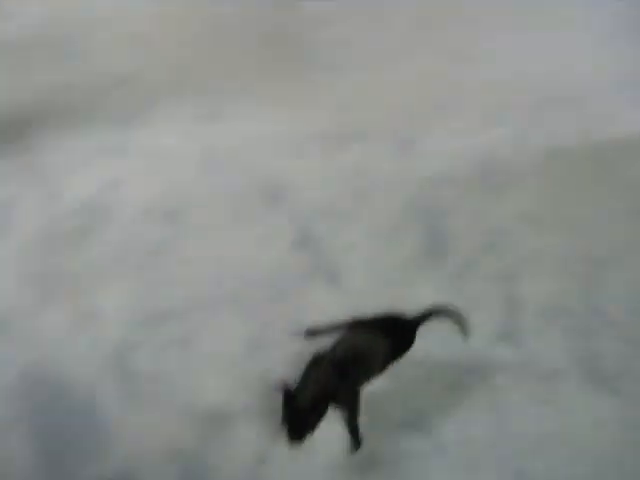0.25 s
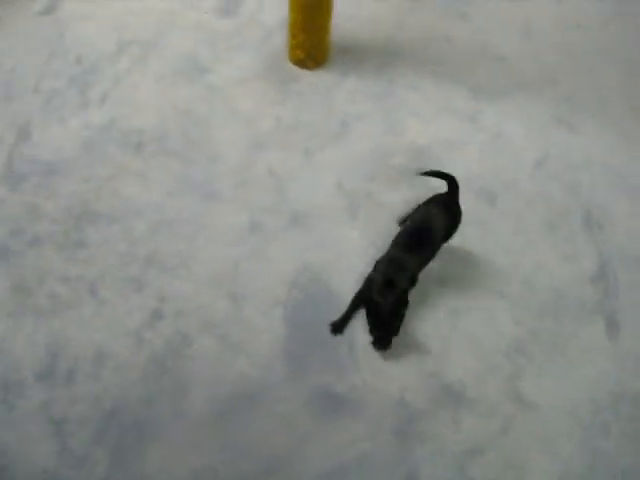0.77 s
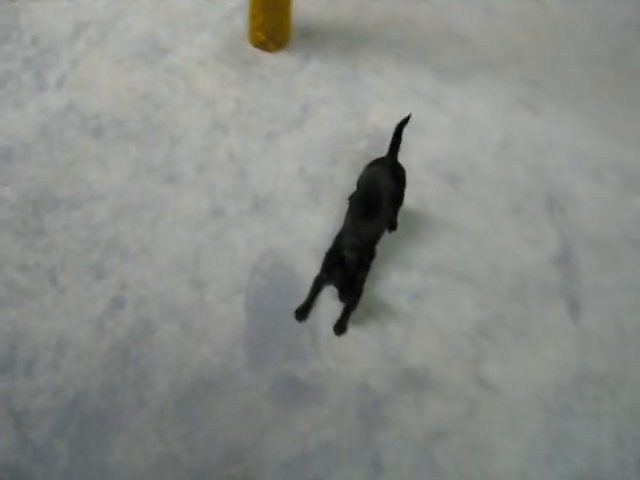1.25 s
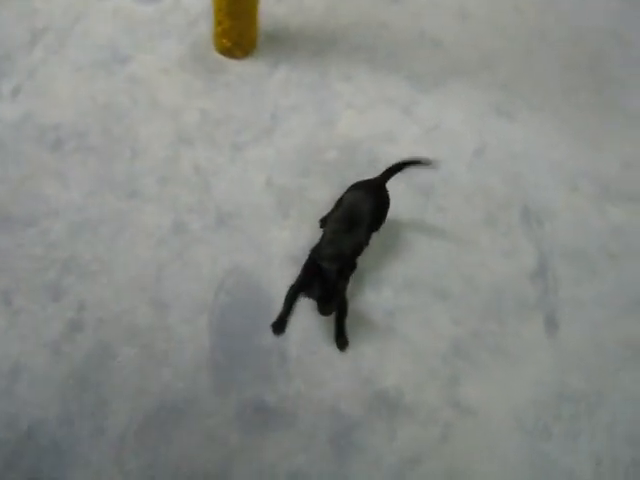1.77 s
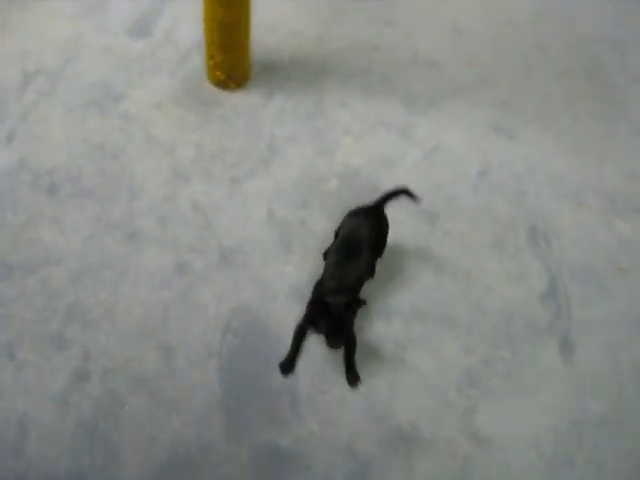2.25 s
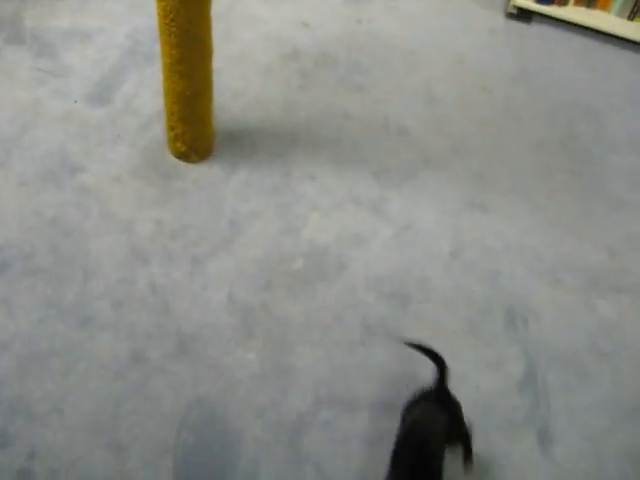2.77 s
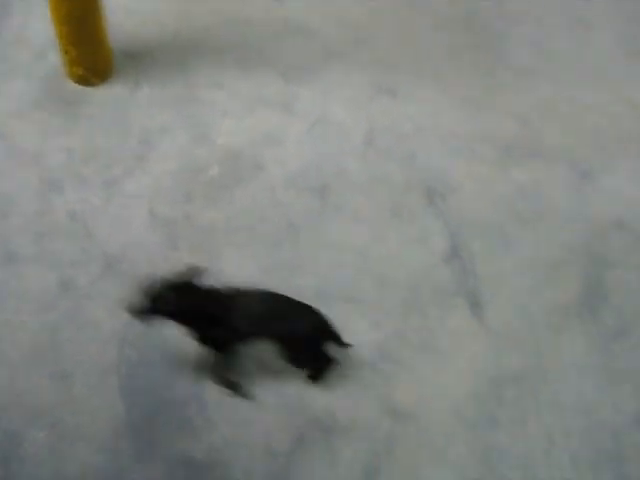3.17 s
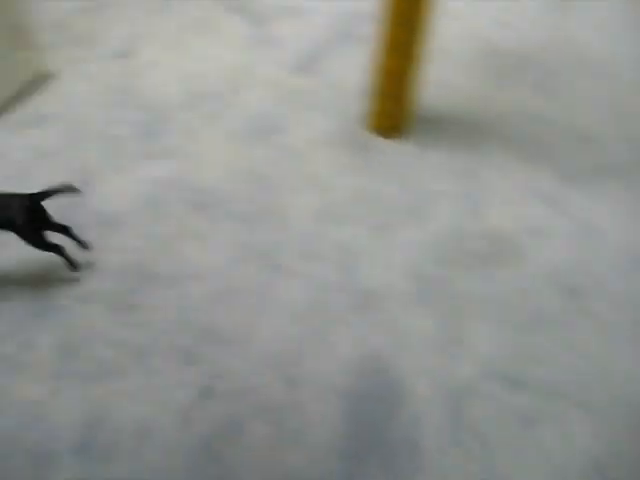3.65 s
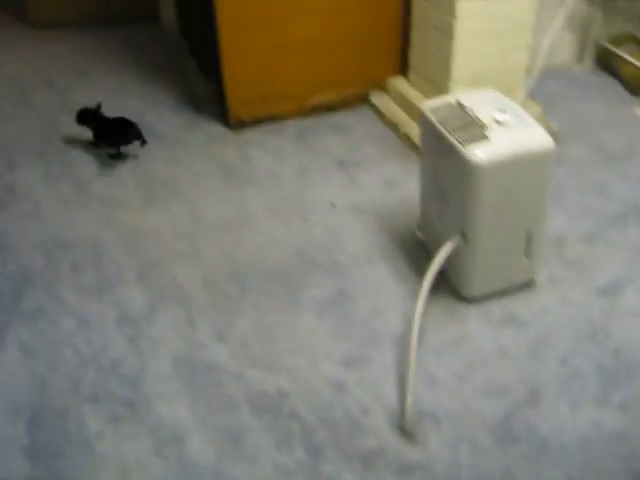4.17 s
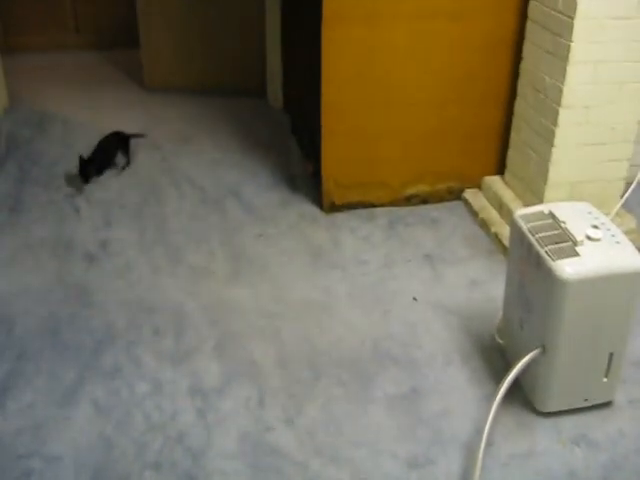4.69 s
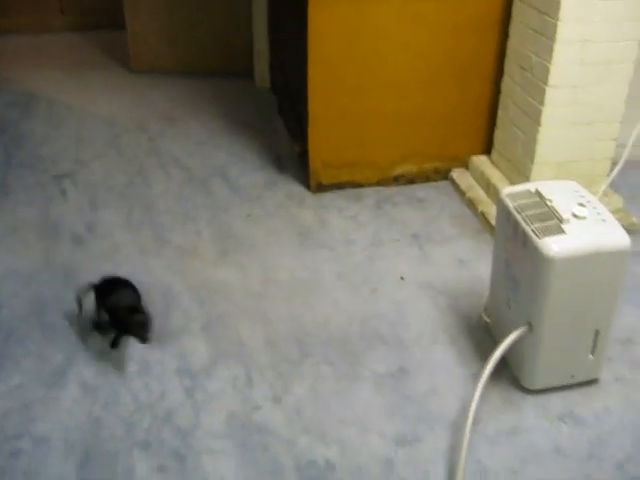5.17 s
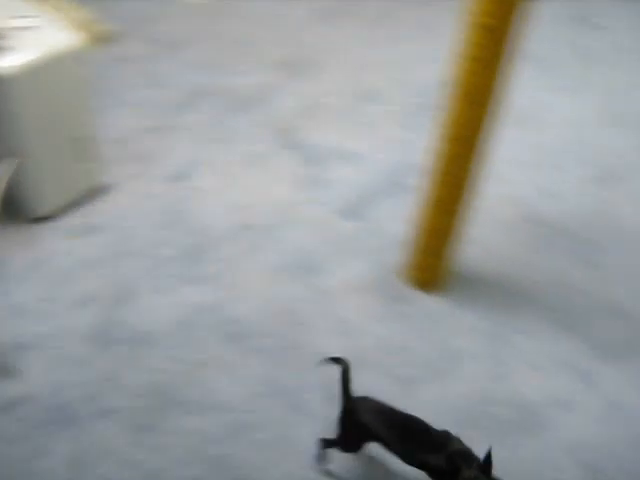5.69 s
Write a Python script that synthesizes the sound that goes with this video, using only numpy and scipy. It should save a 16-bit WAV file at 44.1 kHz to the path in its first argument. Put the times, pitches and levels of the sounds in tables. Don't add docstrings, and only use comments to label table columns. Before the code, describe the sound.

Faint fan wash and light claw and paw noise on carpet open the scene, with near-still gaps. A rough little growl rises to a bark and cracking yip around three seconds, with clacks. Quick footfalls follow, then a gape and closed grumble. From five seconds come snappy yaps, a double chewing call and loud short knocks; a last bark drops away. Small microphone, slight room echo.

```python
import sys
import numpy as np
from scipy import signal
from scipy.fft import irfft
from scipy.io import wavfile
from scipy.ndimage import uniform_filter1d

SR = 44100
rng = np.random.default_rng(int(sys.argv[2]) if len(sys.argv) > 2 else 0)


def voltage_ratio(level):
    return 10 ** (np.asarray(level, float) / 20)


def dump(signal):
    limited = np.clip(np.atleast_2d(signal).T, -1, 1)
    pcm = np.round(limited * 32767).astype(np.int16)
    wavfile.write(sys.argv[1], SR, pcm)


N = 261556


def evened(x):
    return x / np.sqrt(np.mean(x ** 2) + 1e-20)


def steady(x):
    return x / np.sqrt(abs(uniform_filter1d(x ** 2, 1500)) + 1e-12)


def wander(n, span):
    return evened(uniform_filter1d(uniform_filter1d(rng.standard_normal(n), span), span))


def band(x, lo_hz, hi_hz):
    return evened(signal.sosfilt(signal.butter(2, [lo_hz, hi_hz], "band", fs=SR, output="sos"), x))


def highpass(x, order, hz):
    return signal.sosfilt(signal.butter(order, hz, "high", fs=SR, output="sos"), x)


def resonate(x, hz, width):
    turn = np.exp(2j * np.pi * np.cumsum(hz * np.ones(len(x))) / SR)
    r = np.exp(-np.pi * width / SR)
    return 2 * (turn * signal.lfilter([1 - r], [1, -r], x / turn + 1e-18)).real


def read(points, hz):
    f, value = np.transpose(points)
    return np.interp(np.log(hz + 1), np.log(f + 1), value)


def columns(rows):
    s, *rest = np.transpose(rows)
    t = np.arange(s[0], s[-1] + 0.005, 1 / SR)
    edge = np.sqrt(np.clip(np.minimum(t - s[0], t[-1] - t) / 0.005, 0, 1))
    step = np.interp(t, s, np.arange(len(s)))
    step -= 0.6 * np.sin(2 * np.pi * step) / (2 * np.pi)
    return s[0], edge, [np.interp(step, np.arange(len(s)), c) for c in rest]


def add(mix, s, sound):
    part = mix[round(s * SR):][:len(sound)]
    part += sound[:len(part)]


def tract(rows, throat_hz, mouth_from_hz, mouth_to_hz, teeth_from_hz, teeth_to_hz, throat_db, shift):
    s, chest_db, hz, jaw, lips = np.transpose(rows)
    glide = (s - s[0]) / (s[-1] - s[0])
    throat = throat_hz * (1 + shift * (glide - 0.5))
    mouth = mouth_from_hz + (mouth_to_hz - mouth_from_hz) * glide
    teeth = teeth_from_hz + (teeth_to_hz - teeth_from_hz) * glide
    throat_level, mouth_level, teeth_level = throat_db - 4.5 + 7 * jaw, -10.5 + 25 * jaw, -25 + 29.5 * lips
    return np.transpose([s, chest_db, hz, throat, throat_level, mouth, mouth_level, teeth, teeth_level])


def growl(rows, rough, group, pace, throat_width, back, cheek, beat_db, throb_db):
    s, edge, (chest_db, hz, throat_hz, throat_db, mouth_hz, mouth_db, teeth_hz, teeth_db) = columns(rows)
    n, rough = len(hz), np.clip(rough, 0, 1)
    turns = np.cumsum(pace * hz * (1 + 0.13 * rough * wander(n, 90))) / SR
    pulses = evened(np.diff(np.floor(turns), prepend=0))
    puffs = evened((0.42 + np.exp(-(turns % 1) / 0.5)) * rng.standard_normal(n))
    flutter = turns / group + 0.25 * rough * wander(n, 400)
    beat = voltage_ratio(beat_db * np.cos(2 * np.pi * flutter) + 2.6 * rough * wander(n, 350))

    def ring(f, width, air):
        x = beat * ((1 - air * rough) * pulses + air * rough * puffs)
        for share in (1, 5.2, 4.86):
            x = resonate(x, f, share * width)
        return steady(x)

    chest = ring(hz, 255, 0.99) + 0.19 * ring(2 * hz, 134, 0.13)
    throat = ring(throat_hz, throat_width, 1.0)
    mouth = steady(ring(mouth_hz, 210, 0.9) + back * ring(1.27 * mouth_hz, 140, 0.9))
    teeth = ring(teeth_hz, 280, 0.89) + 0.18 * ring(1.078 * teeth_hz, 200, 1.0)
    teeth = steady(teeth + cheek * ring(0.72 * teeth_hz, 330, 0.6))
    throb_turns = np.cumsum(33.2 * (1 + 0.028 * wander(n, 2000))) / SR
    throb = voltage_ratio(throb_db * np.cos(2 * np.pi * (throb_turns - 0.4)))
    voice = throb * chest - np.sqrt(throb) * voltage_ratio(throat_db) * throat
    voice += voltage_ratio(mouth_db) * mouth - throb * voltage_ratio(teeth_db) * teeth
    return s, voltage_ratio(chest_db) * edge * highpass(voice, 3, 200)


def calls():
    # (time [s], chest level [dB], fold rate [Hz], jaw [0 shut - 1 wide],
    # lips [0 closed - 1 drawn off the teeth])
    growls = [
        [(2.828, -39.5, 314.4, 0.52, 0.9), (2.87, -38.5, 330.3, 0.42, 0.85), (2.888, -39.5, 339.8, 0.58, 0.3),
         (2.905, -39.5, 332.5, 0.65, 0.61), (2.93, -40, 325, 0.39, .05), (2.995, -39, 307, 0.14, .01)],
        [(4.2, -52, 358.4, 0.89, 0.96), (4.226, -35, 409.8, 0.74, 0.61), (4.265, -36, 318.8, 0.24, 0.12),
         (4.315, -43.5, 312.5, 0.36, 0.13), (4.365, -44, 289, 0.13, .05)],
        [(4.37, -44, 308, 0.35, 0.12), (4.43, -35, 308, .2, 0.055), (4.49, -46, 305, 0.49, 0.13),
         (4.56, -43.5, 304.3, 0.41, 0.18), (4.624, -44, 302, 0.15, 0.43), (4.645, -56, 304, .15, 0.78),
         (4.68, -72, 305, .05, 1.48)],
    ]
    yaps = [
        [(4.938, -40, 306, 0.087, 0.72), (4.976, -46, 333.3, 0.68, 0.87), (5.02, -52.5, 375, 0.083, 0.94)],
        [(5.148, -46.5, 268.7, .05, 0.99), (5.175, -45.5, 286.1, 0.54, 0.89), (5.2, -41.5, 298.9, 1.05, 1.09),
         (5.245, -42.5, 396, 0.41, 0.42)],
        [(5.245, -48, 355.5, .1, 1), (5.263, -36, 335, 0.87, 0.88), (5.3, -40, 344.6, 0.54, 0.81),
         (5.33, -47, 352, .3, 0.58)],
        [(5.33, -46, 316.6, 0.38, 0.23), (5.344, -48, 321.2, 0.83, 0.99), (5.372, -37, 336, 0.42, 0.26),
         (5.396, -35, 366, 0.88, 0.7), (5.425, -39, 356.4, 0.7, 0.63), (5.453, -39.5, 330.3, 0.38, 0.36),
         (5.49, -54, 326, .2, 0.74)],
        [(5.62, -43, 319, .05, .5), (5.636, -36.5, 320.3, 0.58, 0.83), (5.71, -58, 347, .05, 0.63)],
    ]
    barks = [
        [(2.995, -42, 364.2, 0.58, .1), (3.029, -35, 396.6, 0.69, 0.33), (3.06, -33.5, 400.8, 0.73, 0.5),
         (3.085, -37, 425.6, 0.76, 0.52), (3.123, -32, 528.7, 1.25, 0.84), (3.138, -63, 544, 1.2, 0.55)],
        [(5.778, -41, 405, 0.44, 0.81), (5.795, -30.5, 421, 0.44, 0.61), (5.82, -33, 415.2, .6, 0.71),
         (5.845, -38, 381.4, 0.6, 0.6), (5.855, -33.5, 371, 0.18, 0.14), (5.896, -38.5, 314, 0.078, 0.046),
         (5.93, -56, 303, 0.013, 0.85)],
    ]
    # (throat [Hz], mouth from [Hz], mouth to [Hz], teeth from [Hz], teeth to [Hz])
    cavities = [(837, 1660, 1550, 3850, 4000), (827, 1450, 1400, 3610, 4300), (799, 1394, 1330, 3300, 2740),
                (1500, 2420, 2480, 3350, 4600), (880, 1520, 1676, 3050, 4800),
                (910, 1400, 1280, 3100, 2900), (880, 1270, 1360, 3490, 3450), (950, 1510, 1380, 3900, 2900),
                (770, 1390, 1290, 3600, 3970), (770, 1570, 1340, 3890, 2940)]
    shifts = [-.03, -0.044, .01, .01, .01, .01, -0.15, .01, -0.016, -.11]
    folds = [(.6, 3, 1), (.55, 3, 1), (.5, 2, 2 / 3), (.95, 2, 1), (.6, 2, 1), (.3, 2, 1), (.45, 2, 1),
             (.62, 2, 1), (.45, 2, 1), (.38, 3, 1)]
    # (throat level [dB], throat width [Hz], back of the mouth [share],
    # cheek [share], group beat [dB])
    colours = [(0.6, 410, 0.45, 0.76, 3), (3.5, 205, 0.99, .35, 2), (6.5, 105, 0.84, .35, 3.5),
               (3.5, 520, 0.27, .35, 2.1), (2, 380, 1, 0.37, 0.5), (-10, 100, .9, .3, 2.5),
               (2.5, 97, 0.34, 0.53, 2.5), (0.5, 115, 0.69, .35, 4.5), (0.5, 120, 0.73, 0.16, 1.5),
               (4.5, 195, 0.67, 0.38, 3)]
    mix = np.zeros(N)
    for i, rows in enumerate(growls + yaps + barks):
        throat_db, *colour = colours[i]
        throb_db = 2.5 if i < len(growls) else 0
        add(mix, *growl(tract(rows, *cavities[i], throat_db, shifts[i]), *folds[i], *colour, throb_db))
    return mix


def yip_note(rows, tones, fray):
    s, edge, (hz, level_db) = columns(rows)
    n = len(hz)
    turns = np.cumsum(hz * (1 + np.linspace(0.004, fray, n) * wander(n, 45))) / SR
    opening = np.minimum(np.linspace(0, 2.2, n), 1)
    flicker_db = np.linspace(1.6, 3.0 + 70 * fray, n)
    stack = np.zeros(n)
    for k, (start_db, end_db) in enumerate(tones):
        tone_db = start_db + (end_db - start_db) * opening + flicker_db * wander(n, 110)
        stack += voltage_ratio(tone_db) * np.cos(2 * np.pi * ((k + 1) * turns + rng.random()))
    breath = band(band(rng.standard_normal(n), 1200, 4800), 1000, 4800)
    return s, voltage_ratio(level_db) * edge * (steady(stack) + voltage_ratio(-15) * breath)


def yip():
    # (time [s], pitch [Hz], level [dB])
    low = [(3.121, 565, -14), (3.13, 578, -26), (3.138, 613, -17.5), (3.15, 634, -15.5),
           (3.162, 653.6, -24), (3.171, 654, -21), (3.185, 581, -28.5)]
    high = [(3.179, 1414, -56), (3.187, 1019, -19.5), (3.2, 1063, -23), (3.21, 1150, -21.5),
            (3.222, 1114, -27), (3.245, 1103, -31), (3.27, 1140, -34), (3.31, 1158, -41),
            (3.355, 1140, -46)]
    # (level at the start [dB], level at the end [dB])
    low_tones = [(-25, -49), (8, -11), (16, 2), (14, 3), (-26, -13), (8.5, 5), (10, 5), (-16, -11),
                 (-10, -12.5), (0, -11.5)]
    high_tones = [(5, 5.5), (-4, 18.5), (-5, 13.5), (10.5, -12), (-5, -43), (-47, -42)]
    mix = np.zeros(N)
    add(mix, *yip_note(low, low_tones, fray=0.012))
    add(mix, *yip_note(high, high_tones, fray=0.04))
    return mix


def fibres(n):
    sizes_db = 1.0 * rng.exponential(1, n) + 2.0 * wander(n, 60) + 1.4 * wander(n, 500)
    return rng.standard_normal(n) * voltage_ratio(sizes_db)


def stroke(s, rise, fall, top, ends):
    low = np.add(top, ends)
    hold = 0.12
    return [(s - abs(rise), *low), (s - hold * abs(rise), *top), (s + hold * abs(fall), *top),
            (s + abs(fall), *low)]


def pant(rows):
    s, edge, (fizz_db, hiss_db) = columns(rows)
    x = fibres(len(edge))
    patch = evened(resonate(x, 12000 + 1500 * wander(len(x), 900), 900))
    whistle = evened(resonate(x, 6450, 350))
    hiss = evened(band(x, 4800, 7000) + 0.8 * whistle)
    fizz = evened(band(x, 4600, 13200) + 0.44 * patch)
    return s, voltage_ratio(fizz_db) * edge * (fizz + voltage_ratio(hiss_db) * hiss)


def pants():
    # (peak time [s], rise [s], fall [s], fizz level [dB], hiss above the fizz [dB])
    breaths = [
        (2.849, 0.032, 0.29, -63, -1),
        (3.159, 0.14, 0.038, -45.5, -21),
        (4.222, 0.025, 0.082, -51.5, -11),
        (4.971, 0.03, 0.043, -44, -1.5),
        (5.186, 0.016, 0.045, -40.5, -5.5),
        (5.269, 0.027, 0.099, -56, -15),
        (5.389, 0.028, 0.077, -53.5, -17),
        (5.63, 0.01, 0.049, -52.5, 1),
        (5.788, 0.029, 0.11, -54.5, 5),
        (5.925, 0.026, .02, -50.5, -3),
    ]
    mix = np.zeros(N)
    for s, rise, fall, *top in breaths:
        add(mix, *pant(stroke(s, rise, fall, top, [-14, 0])))
    return mix


def wheezes():
    # (middle time [s], level [dB], pitch [Hz])
    puffs = [
        (2.9, -58, 14000),
        (2.93, -59, 13300),
        (2.965, -54, 13900),
        (3.0, -54, 13900),
        (3.04, -53, 10700),
        (3.095, -60, 10000),
        (3.135, -50, 12900),
        (3.215, -49.5, 12500),
    ]
    mix = np.zeros(N)
    for s, db, hz in puffs:
        bell = np.hanning(round(0.057 * SR))
        f = hz * np.linspace(1.04, 0.96, len(bell))
        whistle = evened(resonate(resonate(fibres(len(bell)), f, 900), f, 1200))
        add(mix, s - len(bell) / SR / 2, voltage_ratio(db) * bell * whistle)
    return mix


def scuff(rows):
    s, edge, (fizz_db, *above_db) = columns(rows)
    x = fibres(len(edge))
    sound = evened(band(x, 8400, 10900) + 1.2 * band(x, 11300, 15200))
    ranges_hz = [(3900, 6600), (1900, 4100), (400, 2100)]
    for db, hz in zip(above_db, ranges_hz):
        sound = sound + voltage_ratio(db) * band(fibres(len(x)), *hz)
    return s, voltage_ratio(fizz_db) * edge * sound


def scuffs():
    # (peak time [s], rise [s], fall [s], fizz level [dB], coarseness [dB])
    drags_of_paws = [(0.217, 0.15, .085, -46.5, -12), (0.44, 0.014, 0.067, -57.5, 4.5),
                     (0.5, 0.036, 0.12, -63.5, 6.5), (0.674, 0.056, 0.17, -56, 2),
                     (0.821, 0.078, 0.18, -78, 5), (1.474, 0.051, 0.22, -66.5, 8.5),
                     (1.6, 0.078, 0.079, -59.5, 4.5), (2.378, 0.12, 0.15, -53.5, 1.5),
                     (2.568, 0.014, .11, -59.5, 3), (2.69, 0.054, 0.065, -61, -6),
                     (2.811, 0.074, 0.091, -59, 1.5), (3.335, 0.028, 0.07, -49, 7),
                     (3.424, 0.031, 0.21, -60, 6), (3.63, 0.097, 0.2, -61, -1), (3.72, .012, 0.08, -66, 14),
                     (3.772, 0.056, 0.09, -45, -9), (3.89, .05, 0.047, -64, 5),
                     (3.951, 0.022, 0.2, -60, -0.5), (4.006, 0.051, 0.11, -69, 5),
                     (4.409, 0.053, 0.11, -64, -1), (4.599, 0.083, 0.12, -64.5, 7.5),
                     (4.82, 0.064, 0.15, -75, 13.5), (5.04, 0.041, 0.12, -79, 18),
                     (5.585, 0.084, 0.13, -60.5, 7.5), (5.741, 0.038, 0.13, -68.5, 11)]
    mix = np.zeros(N)
    for s, rise, fall, db, coarse in drags_of_paws:
        # fizz, then hiss, scrape and rustle above it [dB]
        top = [db, 3.24 + 0.15 * coarse, 0.13 + coarse, 2.3 + 0.99 * coarse]
        ends = [0.43 * (-87 - db), 0, 0, 4]
        add(mix, *scuff(stroke(s, rise, fall, top, ends)))
    return mix


def claw_drags():
    starts = [3.71, 5.583, .49, .655]
    # (length [s], level [dB], pitch from [Hz], pitch to [Hz])
    rasps = [
        (0.077, -47.5, 1600, 4000),
        (0.027, -44, 4200, 4100),
        (0.057, -50, 4400, 4500),
        (0.079, -47.5, 5000, 5000),
    ]
    mix = np.zeros(N)
    for s, (length, db, from_hz, to_hz) in zip(starts, rasps):
        bell = np.sqrt(np.hanning(round(length * SR)))
        rasp = resonate(fibres(len(bell)), np.linspace(from_hz, to_hz, len(bell)), 1300)
        add(mix, s, voltage_ratio(db) * bell * evened(rasp))
    return mix


def knock(s, db, hz, t60, grit):
    t = np.arange(0, 0.25, 1 / SR)
    noise = band(rng.standard_normal(len(t)), hz / 1.7, min(hz * 1.8, 16000))
    shape = voltage_ratio(db - 3 - 60 * t / t60) * (1 - np.exp(-t * hz * 1.8))
    return s, shape * (np.sin(2 * np.pi * hz * t) + grit * noise)


def paw_falls():
    # (time [s], level [dB], floor pitch [Hz])
    falls = [(0.154, -38, 172), (0.372, -43, 181), (0.426, -37, 160), (0.677, -47, 167),
             (1.545, -42.5, 143), (2.427, -45, 151), (2.782, -42.5, 167), (3.301, -37, 181),
             (3.385, -40, 174), (3.426, -35, 164), (3.499, -39.5, 176), (3.613, -46, 166),
             (3.714, -39.5, 287), (3.796, -35, 195), (3.818, -33, 179), (3.945, -33, 205),
             (3.969, -45, 195), (4.04, -39, 245), (4.186, -33.5, 278), (4.783, -45.5, 287),
             (5.028, -41, 181), (5.13, -34, 210), (5.175, -28, 222), (5.552, -29.5, 208.5),
             (5.599, -39, 220), (5.753, -33, 203)]
    mix = np.zeros(N)
    for row in falls:
        add(mix, *knock(*row, t60=0.079, grit=1.0))
    return mix


def snags():
    # (time [s], level [dB], pitch [Hz])
    hits = [(0.455, -31, 2500), (0.674, -35, 940), (0.689, -27, 880), (1.579, -32, 1610),
            (2.563, -30.5, 1016), (3.031, -10.5, 1610), (3.35, -14.5, 790), (3.48, -30.5, 880),
            (5.205, -7, 1660), (5.38, -4.5, 1280), (5.789, -11.5, 760), (0.428, -43, 1500),
            (3.002, -15.5, 1600), (5.031, -33, 990), (5.132, -32, 910), (5.151, -29, 1120),
            (5.162, -27, 1200)]
    mix = np.zeros(N)
    for row in hits:
        add(mix, *knock(*row, t60=0.014, grit=0.12))
    return mix


def claw_ticks():
    # (time [s], level [dB], pitch [Hz])
    catches = [(0.4278, -33, 5900), (0.454, -38, 6030), (0.614, -38.5, 5560), (0.6374, -48, 11000),
               (0.51, -39, 3960), (2.457, -38, 3600), (2.4667, -33.5, 3370), (2.5613, -37, 4260),
               (2.645, -41, 3440), (2.707, -39.5, 3430), (2.995, -32, 3350), (3.3944, -46, 5160),
               (3.455, -39, 5500), (3.48, -30, 3470), (4.0194, -35, 5400), (5.1532, -39, 3660),
               (5.162, -40, 3300)]
    mix = np.zeros(N)
    for s, db, hz in catches:
        add(mix, *knock(s, db - 1.5, hz, t60=0.014, grit=0.89))
    return mix


def room(x):
    # (pitch [Hz], time to die by 60 dB [s])
    dying = [(150, 0.51), (500, 0.11), (1200, 0.21), (4000, 0.18), (12000, 0.29)]
    taps = np.zeros(SR // 2)
    at = np.arange(250, len(taps) - 20, 20)
    taps[at + rng.integers(0, 20, len(at))] = rng.choice([-1., 1.], len(at))
    hz, t, z = signal.stft(taps, SR, nperseg=256)
    tail = signal.istft(z * voltage_ratio(-60 * t / read(dying, hz)[:, None]), SR, nperseg=256)[1]
    return signal.fftconvolve(x, tail / np.linalg.norm(tail))[:N]


def fan_hum():
    # (pitch [Hz], level [dB])
    wash_colour = [(12, -42), (20, -1.5), (241, 0.5), (1060, -2), (1290, -5.5), (3440, -5.5), (7730, -12.5),
                   (16000, -15)]
    # (pitch [Hz], level [dB])
    motor = [(360.7, -66.5), (1082, -69), (2040, -72.5), (2519, -98), (3359, -68.5), (4560, -73)]
    frames, hz = N // 512 + 5, np.fft.rfftfreq(2048, 1 / SR)
    a, b, patches = rng.standard_normal((frames, len(hz), 3)).T
    patches = evened(uniform_filter1d(uniform_filter1d(patches, 20, 0), 8, 1))
    spectrum = (a + 1j * b) * voltage_ratio(read(wash_colour, hz)[:, None] + 0.92 * patches)
    wash = signal.istft(spectrum, nperseg=2048, noverlap=1536)[1][:N]
    sound = voltage_ratio(-56) * evened(wash)
    for f, db in motor:
        turns = np.cumsum(f * (1 + 0.00144 * wander(N, 4000))) / SR
        sound += voltage_ratio(db - 3.0) * np.cos(2 * np.pi * turns)
    return sound


def scene():
    pup = highpass(calls() + paw_falls() + snags(), 4, 138)
    cry = yip()
    carpet = pants() + wheezes() + scuffs() + claw_drags() + claw_ticks()
    echo = voltage_ratio(-9) * room(pup + 1.7 * cry)
    return (pup + echo + cry + carpet + fan_hum())[None]


def low_pass(x):
    return signal.sosfilt(signal.butter(12, 16500, fs=SR, output="sos"), x)


def record(dry):
    notch_hz, edge_hz, limit = 7881, 15830, 0.75
    hz = np.fft.rfftfreq(4096, 1 / SR)
    off = (hz - notch_hz) / 750
    port = (abs(off) ** 1.334 + 0.036) / (1 + abs(off) ** 2.494) ** 0.5 * (hz < edge_hz)
    response = np.roll(irfft(port), 2048) * np.hanning(4096)
    heard = signal.oaconvolve(limit * np.tanh(dry / limit), response[None], "same")
    z = signal.stft(heard, nperseg=1024, noverlap=768)[2]
    power = uniform_filter1d(uniform_filter1d(abs(z) ** 2, size=5, axis=1), size=5, axis=2)
    level_db = 10 * np.log10(abs(power) + 1e-20)
    under_db = np.maximum(level_db.max(1, keepdims=True) - 51, -101) - level_db
    under_db[:, :20] += 9
    z = z * voltage_ratio(-4.0 * np.clip(under_db, 0, 8))
    kept = signal.istft(z, nperseg=1024, noverlap=768)[1][:, :N]
    return low_pass(kept)


dry = scene()
out = record(dry)
dump(out)
```